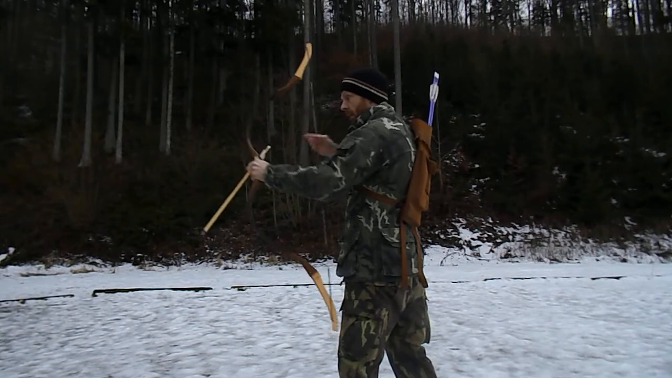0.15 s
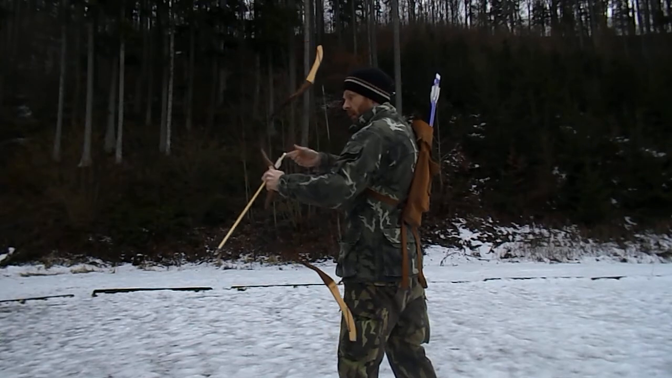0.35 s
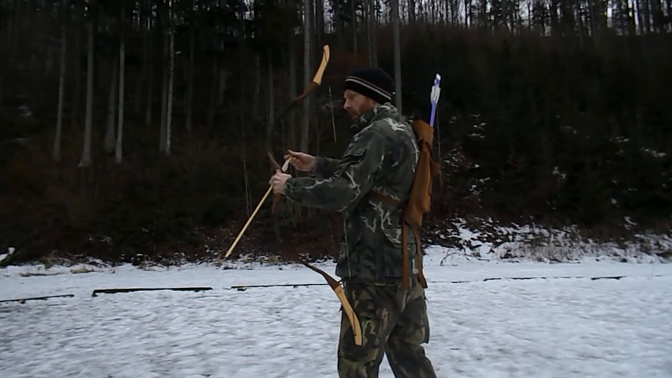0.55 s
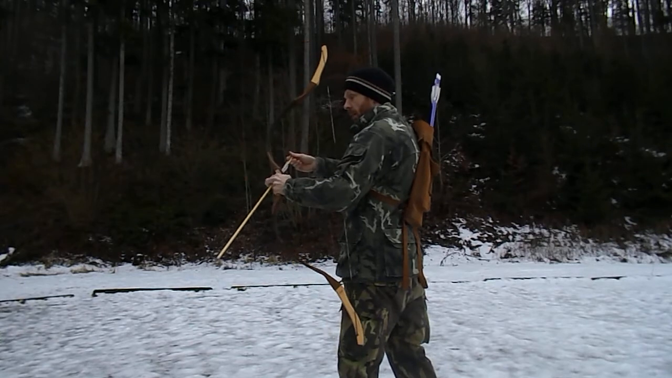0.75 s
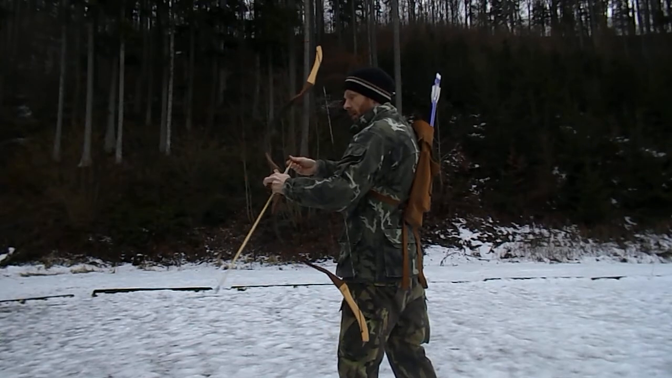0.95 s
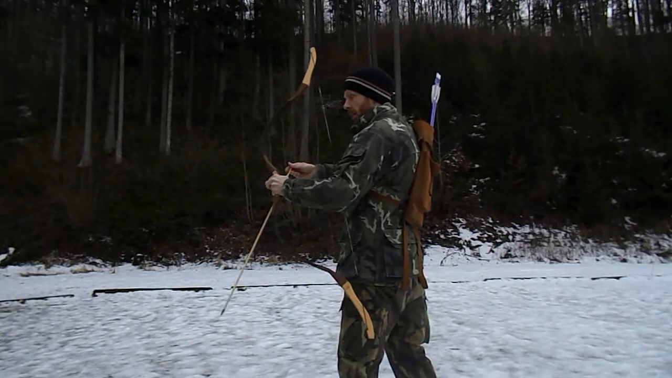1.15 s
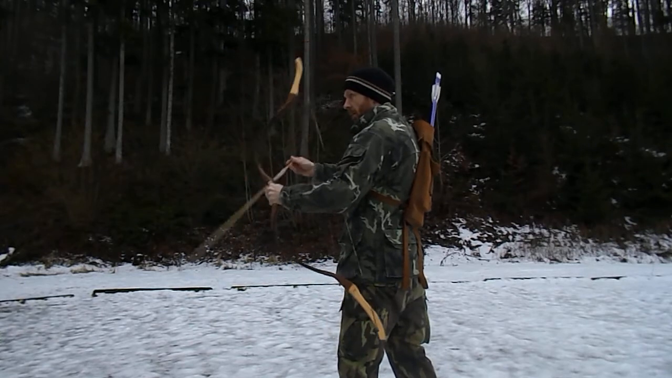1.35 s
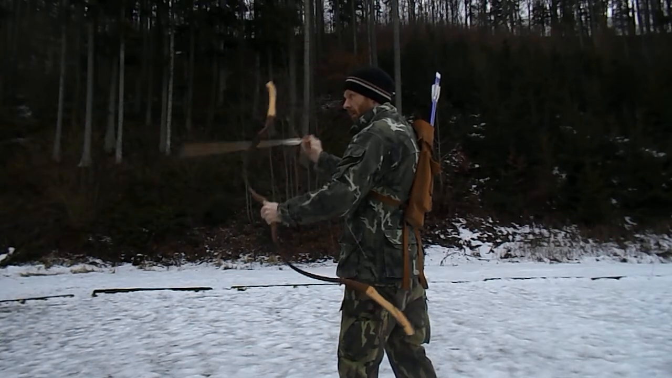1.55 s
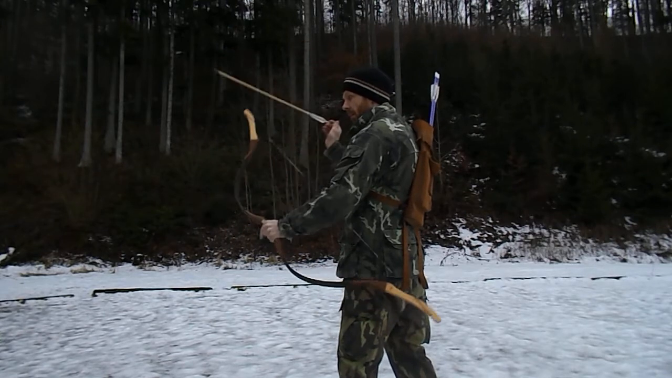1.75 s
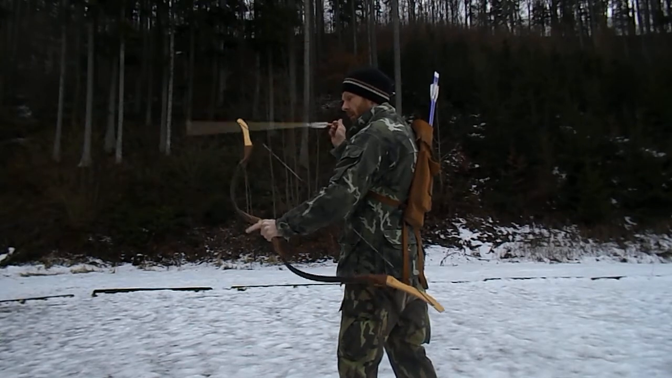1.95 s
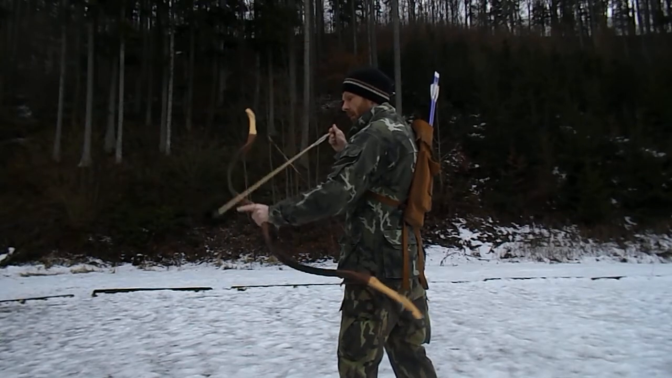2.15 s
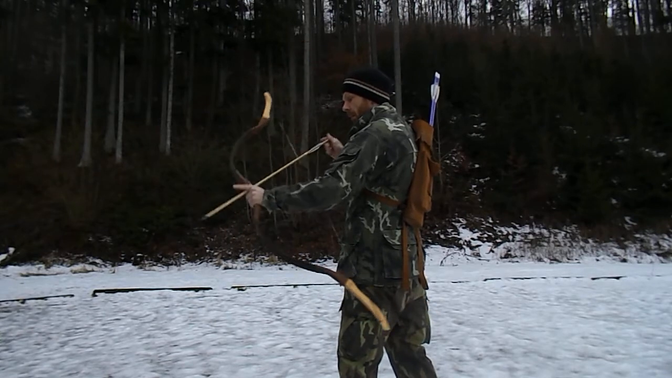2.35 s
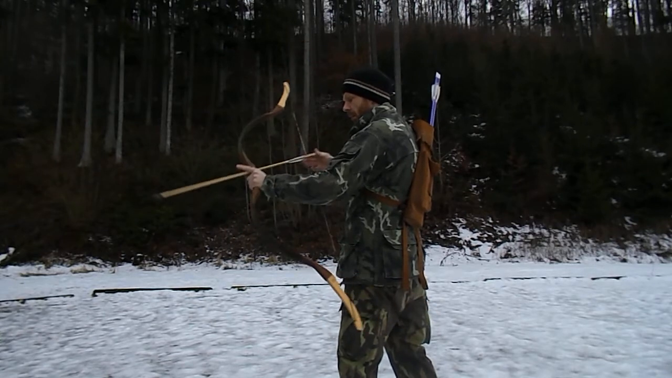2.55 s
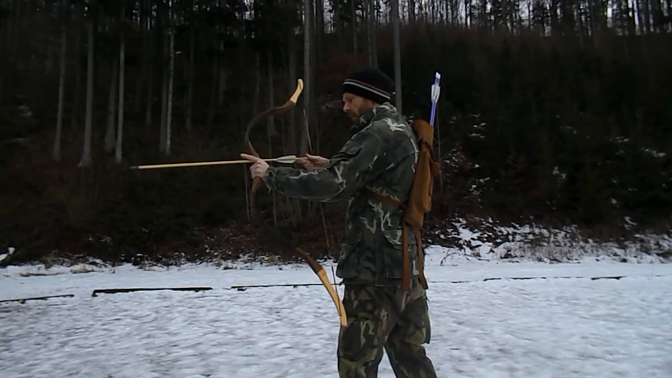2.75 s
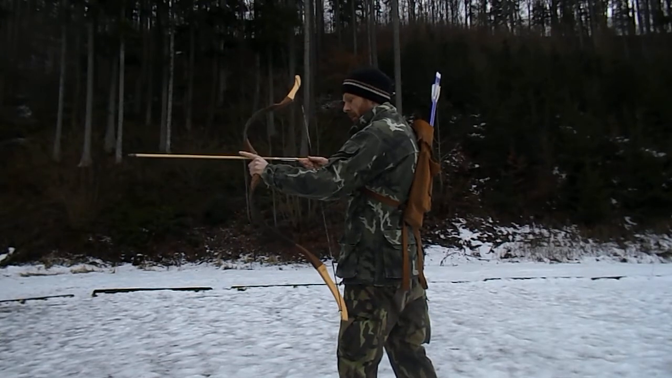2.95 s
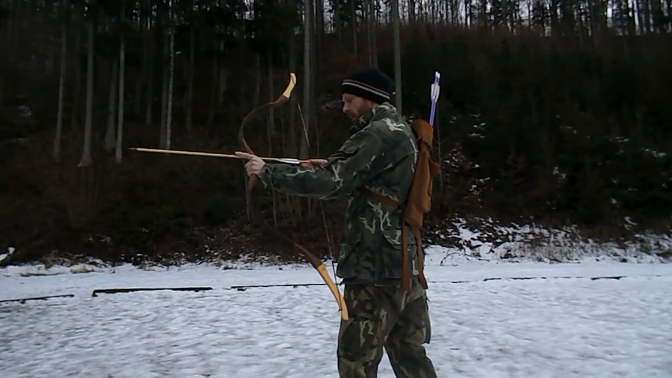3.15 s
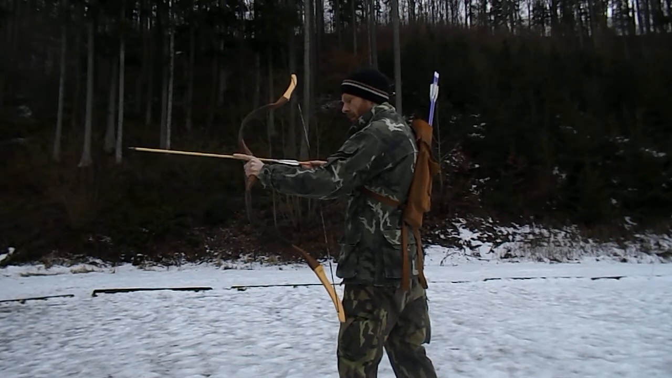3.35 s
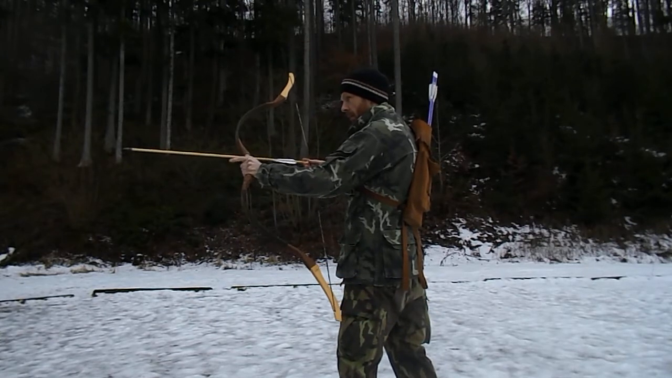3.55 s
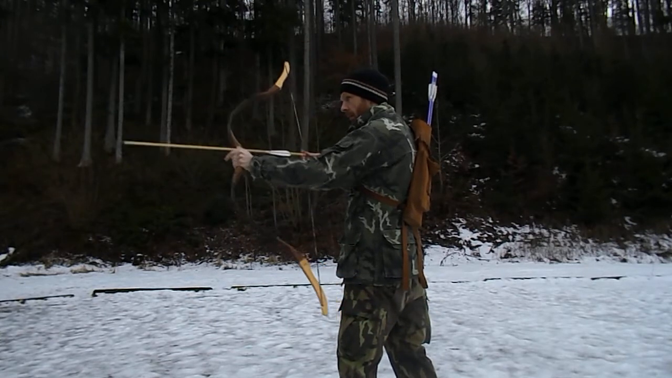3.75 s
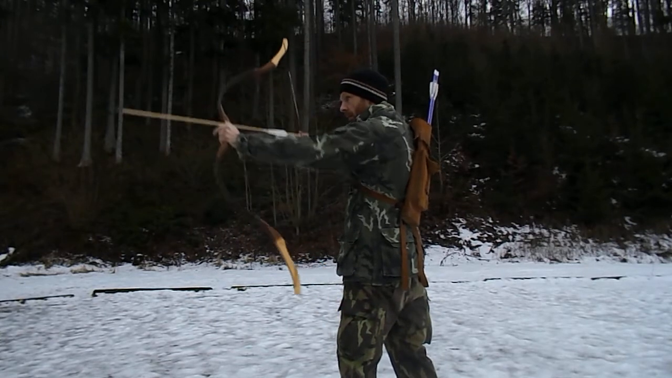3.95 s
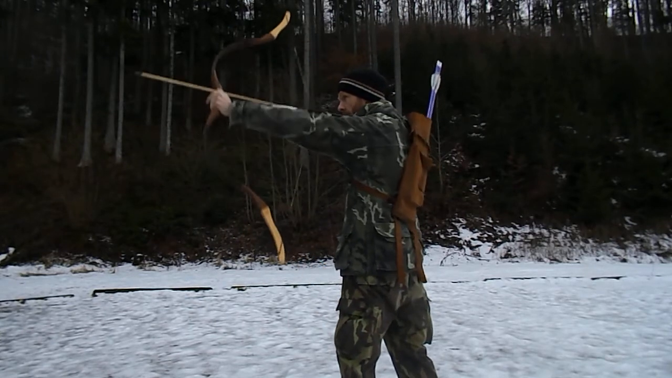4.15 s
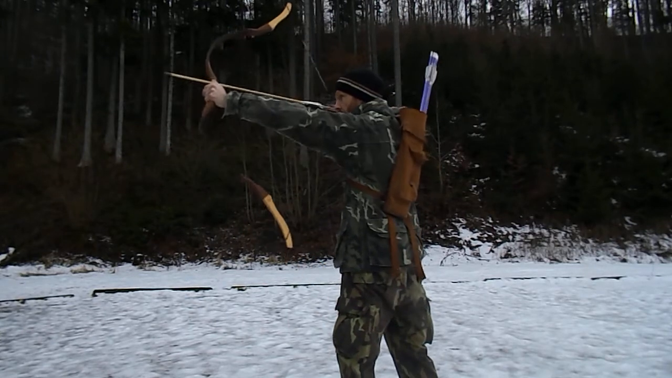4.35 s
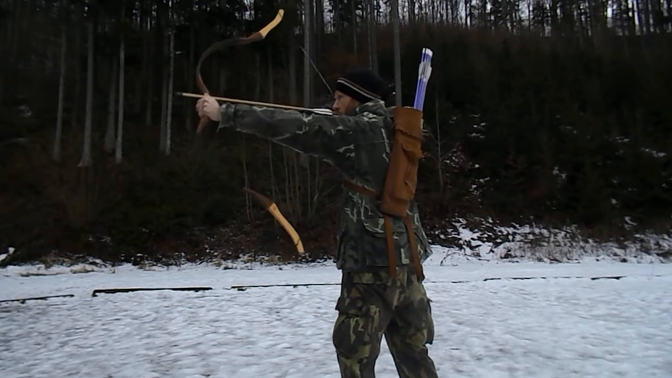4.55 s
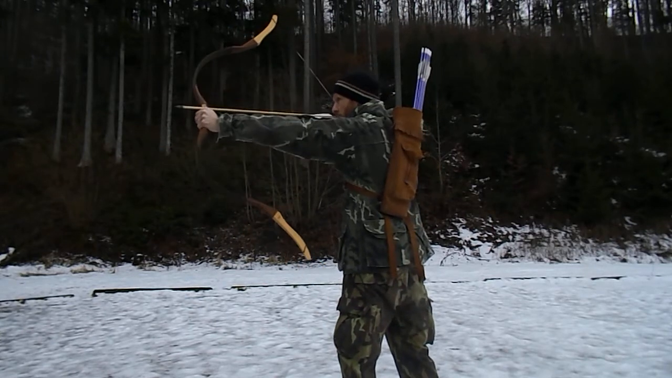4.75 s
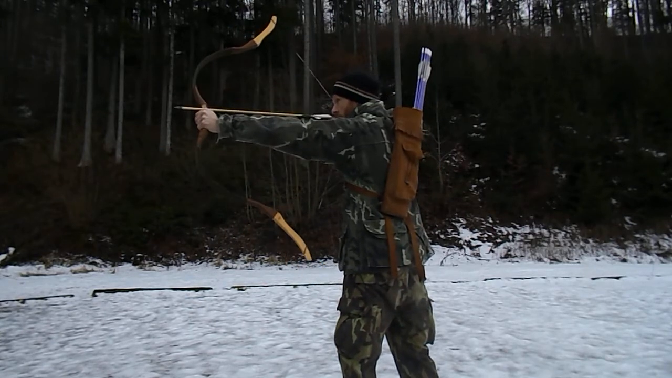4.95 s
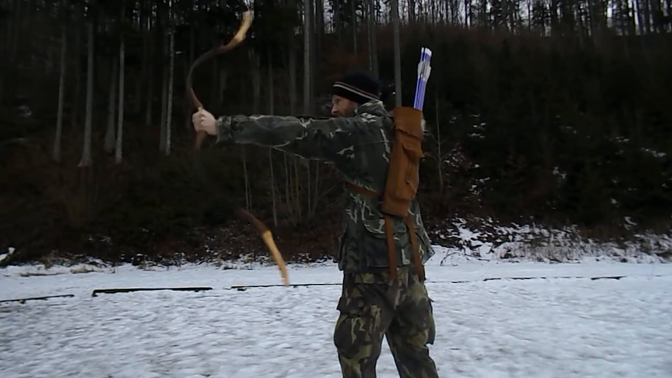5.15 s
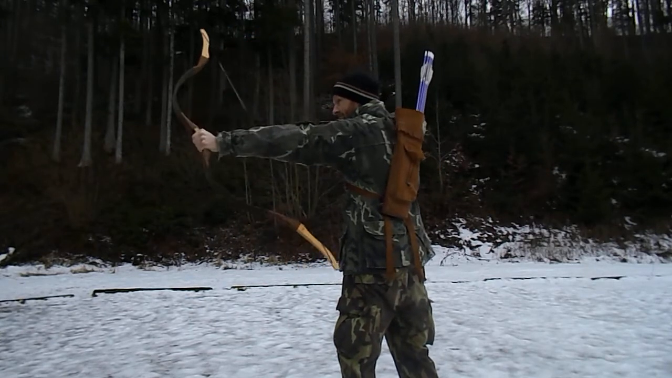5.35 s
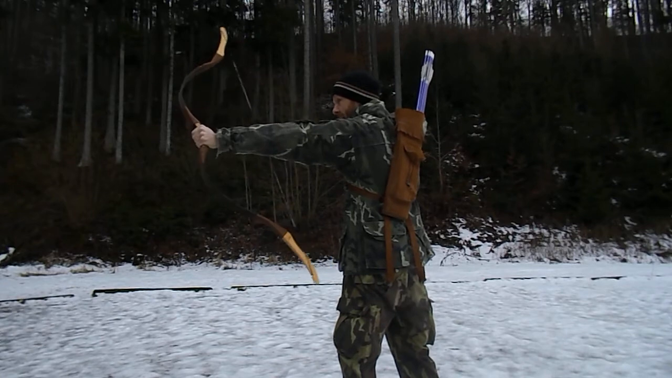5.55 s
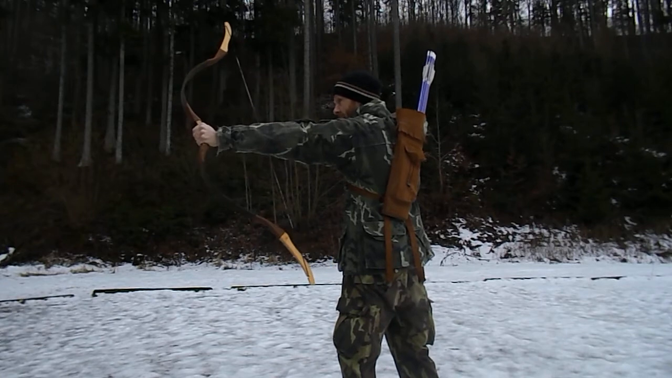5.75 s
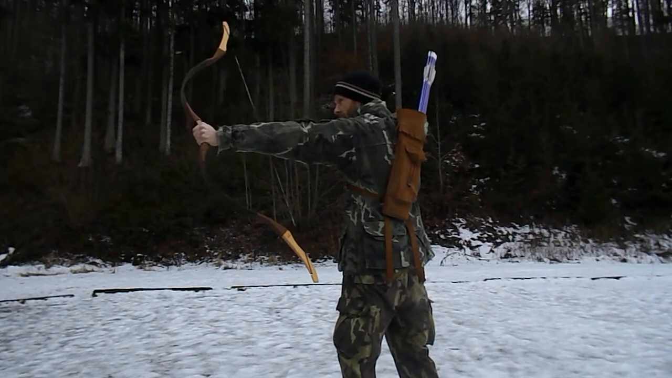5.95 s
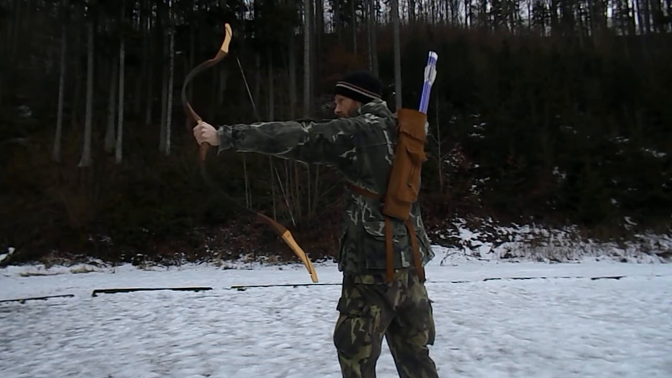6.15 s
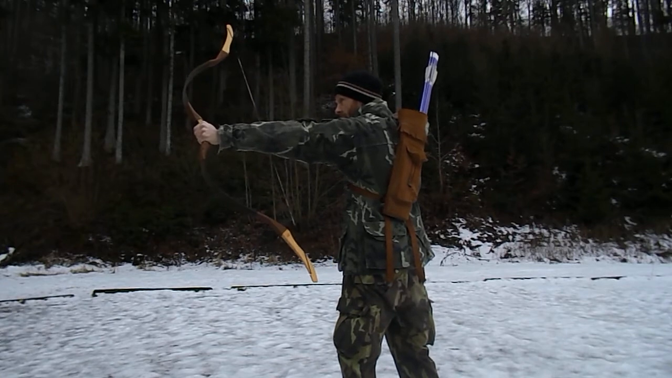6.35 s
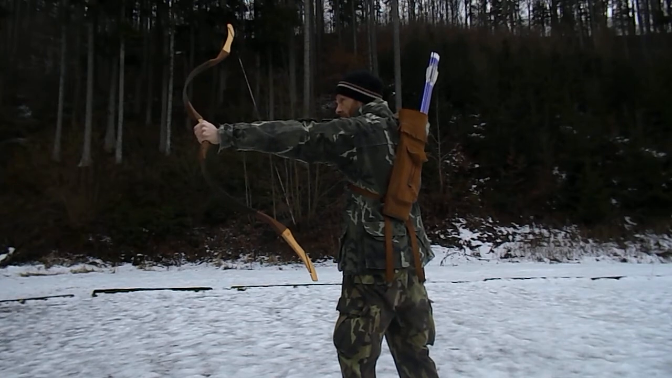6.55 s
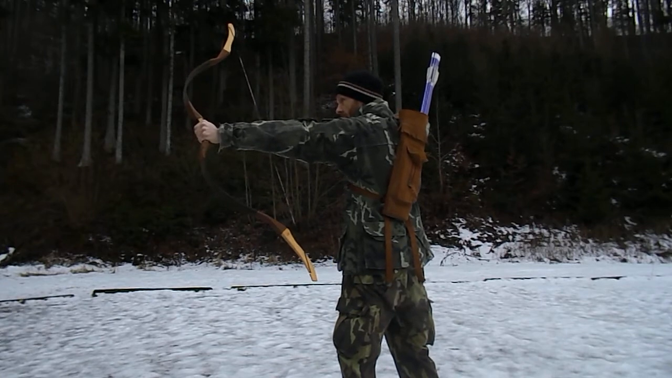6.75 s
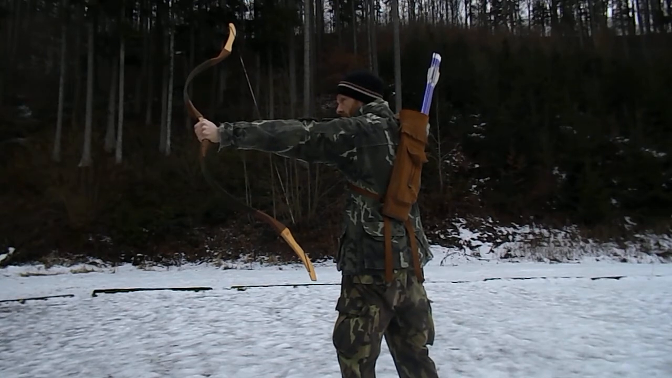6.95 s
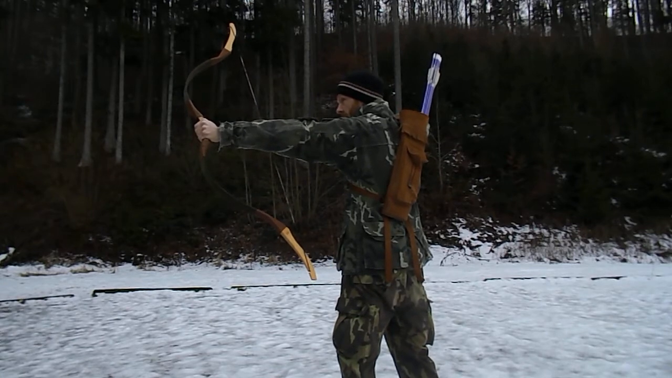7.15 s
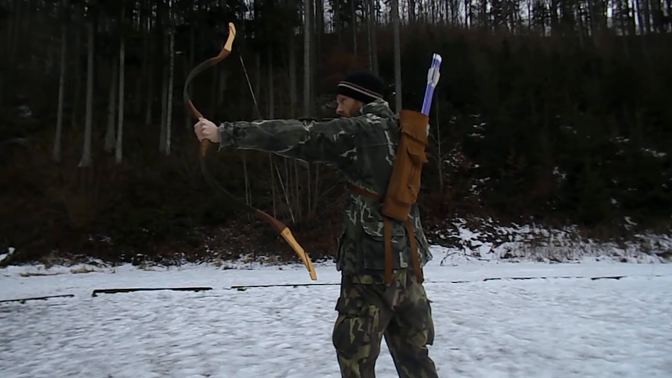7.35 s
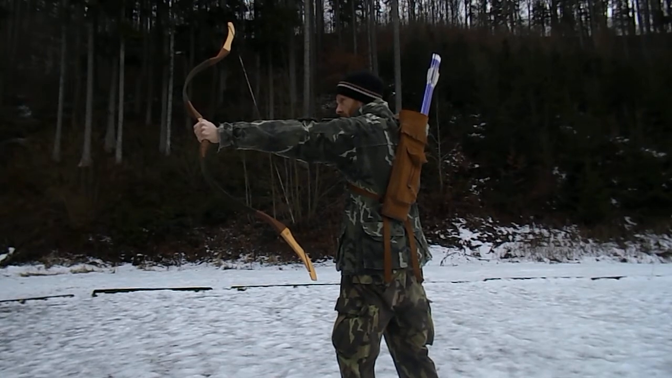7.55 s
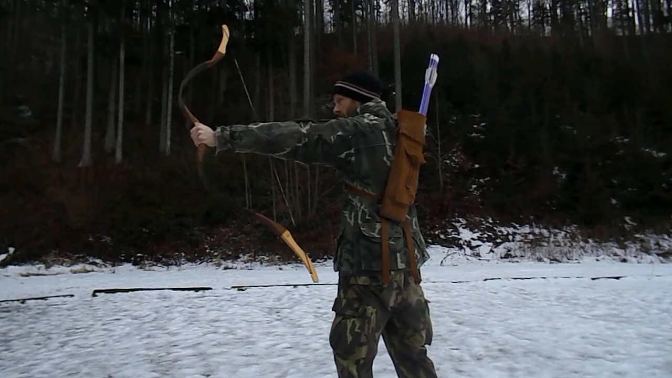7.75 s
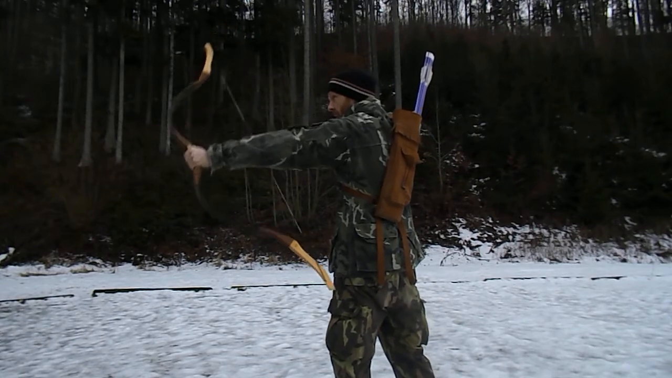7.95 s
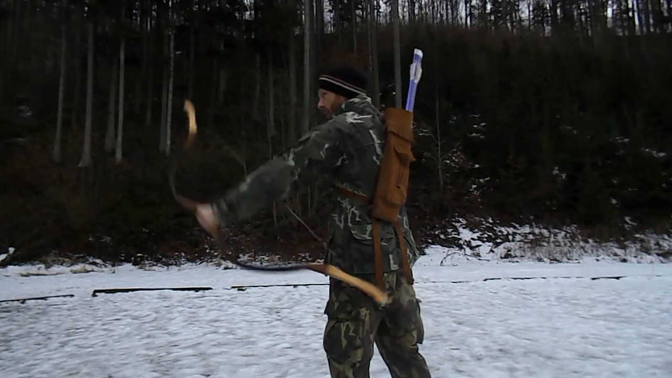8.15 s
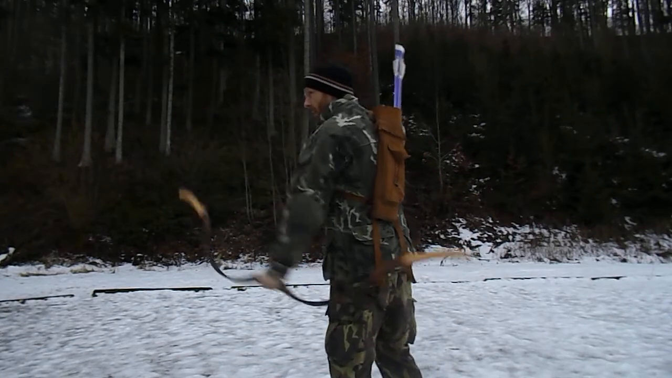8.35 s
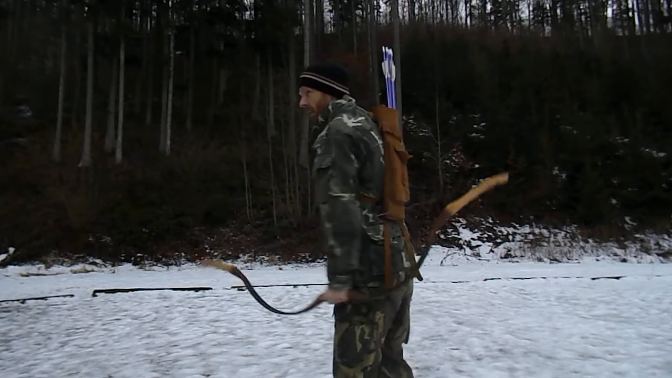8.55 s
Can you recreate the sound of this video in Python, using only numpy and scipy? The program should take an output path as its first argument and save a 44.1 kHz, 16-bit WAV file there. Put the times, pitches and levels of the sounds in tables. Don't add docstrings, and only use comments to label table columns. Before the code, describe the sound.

A quiet forest edge in snow, heard in close natural stereo: soft wash from distant trees, light hiss and barely noticeable wind puffs throughout. A tiny creak comes near 0.9 s, a faint bird phrase at 1.3 s. At 2.2 s an arrow shaft knocks a wooden bow grip, bouncing quickly; from 2.4 to 2.8 s the nock scrapes and ticks crisply onto the string. Between 3.2 and 5 s the bird gives four clear whistles, each followed by a buzzy falling trill, growing louder, over faint cloth and creaks. At 5.19 s the string slaps hard, dry and woody, with short limb hum; at 5.27 s the arrow cracks and crunches into a close target with a compact thud, then rattles around 5.33 s. Short tree reflections fade. Slight cloth brushes and creaks follow from 6.3 s; the bird returns at 7.9 and 8.4 s, and a small strap snap lands at 8.55 s.

```python
import sys
import numpy as np
from scipy import signal
from scipy.fft import rfft, irfft
from scipy.io import wavfile
from scipy.ndimage import uniform_filter1d

SR = 44100
rng = np.random.default_rng(int(sys.argv[2]) if len(sys.argv) > 2 else 0)


def master(y):
    cut = np.clip(np.atleast_2d(y).T, -1, 1)
    pcm = np.round(cut * 32767)
    wavfile.write(sys.argv[1], SR, pcm.astype(np.int16))


def gain_from_db(level_db):
    decades = np.asarray(level_db, float) / 20
    return 10 ** decades


N = 383096

# f/Hz, level per Hz/dB
AIR_SPECTRUM = [(18, -90), (30, -62), (68, -29), (117, -24.5), (145, -16), (174, -13), (412, -0.5),
                (881, -4.5), (953, -2), (1060, -7), (1270, -5.5), (1490, -9), (4590, -16.5), (10300, -18.5),
                (15700, -22)]
AIR_DB = -52
# f/Hz, likeness 0-1
AIR_LIKENESS = [(60, 0.59), (150, 0.35), (600, 0.52), (1400, 0.42), (3000, 0.019), (7000, 0.081)]
# t/s, level/dB, length/s, left-right/dB
PUFFS = [
    (.95, -59, 0.043, -6),
    (1.709, -66, 0.055, 15),
    (1.962, -63, 0.059, 2),
    (8.55, -76, .04, 0),
]
# f/Hz, time to fall 60 dB/s
NEAR_TREES = [(200, 0.33), (1500, 0.32), (5000, 0.06), (12000, 0.13)]
FAR_TREES = [(3000, 0.32), (6000, 0.63)]

# t/s, whistle level/dB, wait for second note/s, its level/dB, its f/Hz
SONG = [
    (1.33, -64, .19, -55, 4700),
    (3.235, -61, 0.22, -54.5, 4780),
    (3.715, -57, .221, -52.5, 4740),
    (4.212, -52, 0.21, -48.5, 4760),
    (4.735, -47.5, .189, -51, 4610),
    (7.935, -59, 0.21, -54, 4730),
    (8.42, -51, 0.2, -49.5, 4670),
]
WHISTLE_S, WHISTLE_HZ = 0.105, 4250
TRILL_S, TRILL_DEPTH_HZ = 0.066, 270

# centre f/Hz, width/octaves, left-right/dB
STRING = (2250, 1.46, -1.05)
GRIP = (700, 1.8, -1)
FEATHERS = (9500, 0.61, -9)
CRUST = (8800, 1.1, -3)
STUFFING = (1500, 2.2, 0)
SPLINTER = (13500, .4, 0)
RATTLE = (8000, 1.4, 0)
NOCK = (7900, 0.6, -8)
SHELF = (3000, 0.9, -3)

# t/s, level/dB, time to fall 60 dB/s
NOCK_HITS = [(2.391, -42.5, 0.017), (2.49, -54.5, 0.53), (2.551, -48, 0.018), (2.609, -50, 0.017),
             (2.612, -42, .015), (2.6559, -46, 0.054), (2.6964, -41, .03), (2.699, -41.5, .03),
             (2.698, -38, 0.03), (2.733, -47, .06), (3.053, -51, .03), (8.547, -31.5, 0.027)]
# t/s, level/dB
TICKS = [
    (2.5415, -42),
    (2.5648, -35),
    (2.5738, -34),
    (2.6035, -32),
    (2.687, -37),
    (2.7565, -32),
]
TICK_T60 = 0.006
# t/s, level/dB, time to fall 60 dB/s
SHELF_HITS = [
    (.9338, -46, .03),
    (2.603, -43, .023),
    (2.697, -40.5, 0.078),
    (2.756, -42, 0.032),
    (4.548, -46, 0.085),
    (8.4976, -50, .03),
]
# t/s, level/dB, centre f/Hz
BRUSHES = [
    (.022, -55.5, 7000),
    (1.47, -54, 10000),
    (3.52, -50, 8500),
    (3.887, -50, 11000),
    (6.295, -51.5, 9500),
    (7.172, -49.5, 10800),
    (7.724, -52, 9500),
    (8.39, -55, 11000),
]
BRUSH_OCTAVES, BRUSH_T60, BRUSH_PAN_DB = 0.29, 0.11, -8
# t/s, level/dB, centre f/Hz
CREAKS = [
    (0.954, -43.5, 334),
    (2.703, -43, 1040),
    (3.31, -53, 3500),
    (3.444, -49.5, 2330),
    (4.568, -46, 4370),
    (6.263, -52, 2400),
    (6.595, -47, 3300),
    (6.655, -48.5, 2320),
]
CREAK_OCTAVES, CREAK_T60, CREAK_PAN_DB = 0.18, 0.065, -1

# t/s, ring level/dB, low ring/dB, tick/dB, freedom to ring 0-1
TAPS = [
    (2.242, -16.5, -2, 10, .8),
    (2.3112, -22, 0, 8, .35),
    (2.3128, -26, 2, 8, .35),
    (2.3144, -27, 0, 7, .4),
    (2.338, -27.5, -2, 5, .45),
]
TAP_PAN_DB = -3
# f/Hz, level/dB, time to fall 60 dB/s
SHAFT_RING = [(625, -7, 0.044), (890, -3.5, 0.12), (1330, -6.5, .06), (1730, -8, .06), (2090, 15.5, 0.0049),
              (2766, -6, 0.07), (3010, -5, 0.035)]

# t/s, level/dB, time to fall 60 dB/s
STRING_HITS = [
    (5.161, -38, 0.079),
    (5.1698, -20.5, .015),
    (5.1817, -40, 0.072),
    (5.1869, -8, 0.027),
    (5.198, -15, 0.02),
    (5.22, -26.5, .078),
]
# t/s, level/dB, time to fall 60 dB/s
GRIP_HITS = [
    (5.174, -22, 0.062),
    (5.189, -8.5, 0.016),
    (5.2, -21, .094),
]
# t/s, level/dB, time to fall 60 dB/s
FEATHER_HITS = [
    (5.1672, -36, .017),
    (5.186, -21.5, 0.02),
    (5.1983, -26.5, 0.033),
    (5.21, -43.5, 0.18),
]
# f/Hz, level/dB, time to fall 60 dB/s
SLAP_RING = [(2610, -1, 0.029), (2560, 0, 0.042), (3300, 9, 0.0079), (3700, 11, 0.0082), (5680, 1, 0.013)]
LIMB_RING = [(331, -11.5, 0.21), (363, -3.5, 0.033), (560, -17, 0.42), (824, -1.5, 0.11), (1187, -8, 0.1),
             (1526, -9, 0.019)]

# t/s, level/dB, time to fall 60 dB/s
CRUST_HITS = [
    (5.27, -6, 0.038),
    (5.274, -12, 0.036),
    (5.2792, -10, .035),
    (5.285, -25.5, 0.081),
]
# t/s, level/dB, time to fall 60 dB/s
STUFFING_HITS = [
    (5.269, -21, 0.045),
    (5.273, -6, 0.031),
    (5.294, -34, 0.11),
    (5.334, -29, 0.076),
    (5.397, -43, 0.39),
]
# t/s, level/dB, time to fall 60 dB/s
SPLINTER_HITS = [
    (5.274, 0, 0.013),
]
# t/s, level/dB, f/Hz, time to fall 60 dB/s
POINT_RINGS = [
    (5.2703, -2, 4950, .02),
    (5.27, -15, 8900, .012),
    (5.2704, -17, 11600, .02),
    (5.273, -3, 8250, .013),
    (5.2755, -10, 5600, .025),
    (5.271, -14, 3700, .03),
    (5.2795, -10, 8800, .015),
]
# f/Hz, level/dB, time to fall 60 dB/s
BUTT_RING = [(355, 4.5, 0.031), (419, -5, 0.039), (600, 2.5, 0.022), (850, -13, 0.028), (1156, -5, 0.022)]
# t/s, level/dB, time to fall 60 dB/s
RATTLE_HITS = [
    (5.327, -40, .06),
    (5.3321, -16, .018),
    (5.3346, -16, 0.039),
    (5.3425, -19.5, 0.022),
    (5.3465, -28, .02),
    (5.369, -36.5, 0.099),
    (5.4126, -33, 0.035),
]


def unit(x):
    return x / np.sqrt(np.mean(x ** 2) + 1e-20)


def along(points, hz):
    f, value = np.transpose(points)
    return np.interp(np.log(hz + 1), np.log(f + 1), value)


def add(track, s, x, pan_db, lead):
    x = x * gain_from_db([[pan_db / 2], [-pan_db / 2]])
    for ear, shift in enumerate((-int(lead), 0)):
        part = track[ear, round(s * SR) + shift:][:x.shape[1]]
        part += x[ear, :len(part)]


def made_of(material, hits):
    centre_hz, octaves, pan_db = material
    return [(s, db, centre_hz, octaves, t60, pan_db) for s, db, t60 in hits]


def contacts(rows, lead, scatter, rise):
    track, size = np.zeros((2, N)), 8192
    t, hz = np.arange(size) / SR, np.fft.rfftfreq(size, 1 / SR)
    share = np.clip(scatter * hz / (hz + 3000), 0, 1)
    for s, db, centre_hz, octaves, t60, pan_db in rows:
        cracks = rng.standard_normal((3, size)) * gain_from_db(4 * rng.standard_normal(size))
        octaves_away = np.log2((hz + 1) / centre_hz)
        resonance = np.exp(-0.5 * (octaves_away / (octaves * 0.75)) ** 2)
        spectra = rfft(cracks) * resonance
        fade = gain_from_db(-60 * t / max(t60, 0.004)) * (1 - np.exp(-t / (rise * t60)))
        mixed = np.sqrt(1 - share) * spectra[0] + np.sqrt(share) * spectra[1:]
        burst = fade * irfft(mixed)
        add(track, s, gain_from_db(db) * unit(burst) * np.sqrt(np.mean(fade ** 2)), pan_db, lead)
    return track


def ring(modes, attack):
    t = np.arange(SR // 3) / SR
    tones = sum(gain_from_db(db - 60 * t / t60) * np.sin(2 * np.pi * hz * t) for hz, db, t60 in modes)
    return tones * (1 - np.exp(-t / attack))


def trees(x, decays):
    hz, t, z = signal.stft(rng.standard_normal((2, SR // 2)), SR, nperseg=256)
    fade = gain_from_db(-60 * t / along(decays, hz)[:, None])
    tail = signal.istft(z * fade, SR, nperseg=256)[1]
    delayed = np.pad(x, ((0, 0), (500, 0)))
    return signal.fftconvolve(delayed, tail / np.linalg.norm(tail[0]), axes=1)[:, :N]


def air():
    hz, _, z = signal.stft(rng.standard_normal((2, N + 512)), SR, nperseg=2048)
    field = uniform_filter1d(rng.standard_normal(z.shape[1:]), 20, 0)
    field = uniform_filter1d(field, 4, 1)
    patches = gain_from_db(0.59 * unit(field) * (hz < 2500)[:, None])
    turn = np.arccos(np.clip(along(AIR_LIKENESS, hz), -1, 1))[:, None] / 2
    mid, side = np.cos(turn) * z[0], np.sin(turn) * z[1]
    lag = np.exp(1j * np.pi * hz * 3 / SR)[:, None]
    pair = np.array([(mid + side) * lag, (mid - side) / lag])
    pair = pair * patches * gain_from_db(along(AIR_SPECTRUM, hz))[:, None] / np.cos(turn)
    wash = signal.istft(pair, SR, nperseg=2048)[1][:, :N]
    return gain_from_db(AIR_DB) * wash / np.std(wash.mean(axis=0))


def wind():
    track = np.zeros((2, N))
    low = signal.butter(2, [70, 450], "bandpass", fs=SR)
    for s, db, length, pan_db in PUFFS:
        rumble = signal.lfilter(*low, rng.standard_normal((2, 8000)))
        puff = unit(rumble[:, -round(length * SR):])
        add(track, s, gain_from_db(db) * puff * np.hanning(puff.shape[1]), pan_db, lead=0)
    return track


def bird():
    track = np.zeros((2, N))
    whistles = [(s, WHISTLE_S, WHISTLE_HZ, db, 0) for s, db, *_ in SONG]
    trills = [(s + wait, TRILL_S, hz, db, TRILL_DEPTH_HZ) for s, _, wait, db, hz in SONG]
    for s, length, pitch_hz, db, depth_hz in whistles + trills:
        u = np.arange(round(length * SR)) / (length * SR)
        trilled = depth_hz > 40
        uneven = np.interp(u, np.linspace(0, 1, num=20), rng.standard_normal(20))
        trill = np.sin(2 * np.pi * np.cumsum(250 + 75 * uneven) / SR)
        glide = 1 - 0.015 * np.exp(-u / 0.2) + 0.025 * trilled * (0.6 - u)
        hz = pitch_hz * glide + depth_hz * trill + 12 * uneven
        swell = np.sin(np.pi * u ** 1.3) ** 1.25
        swell = swell * (1 + 0.1 * trill * trilled) * gain_from_db(1.6 * uneven)
        note = swell * np.sin(2 * np.pi * np.cumsum(hz) / SR)
        add(track, s, gain_from_db(db + 5.5) * note[None], -6, lead=-5.0)
    return track


def handling():
    ticks = [(*row, TICK_T60) for row in TICKS]
    nock = made_of(NOCK, NOCK_HITS + ticks) + made_of(SHELF, SHELF_HITS)
    cloth = [(*row, BRUSH_OCTAVES, BRUSH_T60, BRUSH_PAN_DB) for row in BRUSHES]
    creaks = [(*row, CREAK_OCTAVES, CREAK_T60, CREAK_PAN_DB) for row in CREAKS]
    return contacts(nock + cloth + creaks, lead=0, scatter=0.71, rise=0.022)


def taps():
    track, t = np.zeros((2, N)), np.arange(SR // 3) / SR
    swing = -np.sin(2 * np.pi * 2900 * t) * np.sin(np.pi * 2900 * t) * (t < 1 / 2900)
    for s, db, low_db, tick_db, free in TAPS:
        modes = []
        for hz, level, t60 in SHAFT_RING:
            mode_hz = hz * rng.normal(1, 0.0084)
            mode_db = level + rng.normal(0, 1) + (hz < 1200) * low_db
            modes.append((mode_hz, mode_db, t60 * max(free, 0.1)))
        grit = signal.lfilter([0.3, 0, -0.3], [1, -1.55, 0.68], rng.standard_normal(len(t)))
        grit = gain_from_db(-5 - 60 * t / 0.016) * grit
        knock = gain_from_db(tick_db) * (swing + grit) - ring(modes, attack=0.00014)
        add(track, s, gain_from_db(db - 14) * knock[None], TAP_PAN_DB, lead=1)
    return track


def bow():
    hits = made_of(STRING, STRING_HITS) + made_of(GRIP, GRIP_HITS) + made_of(FEATHERS, FEATHER_HITS)
    track = contacts(hits, lead=1, scatter=0.17, rise=0.014)
    slap = ring(SLAP_RING, attack=0.0005)[None]
    duller_slap = signal.lfilter([0.4], [1, -0.6], slap)
    add(track, 5.1869, gain_from_db(-8) * slap, -1, lead=1)
    add(track, 5.1886, gain_from_db(-8) * duller_slap, -1, lead=1)
    add(track, 5.1885, gain_from_db(-16.5) * ring(LIMB_RING, attack=0.0006)[None], 0, lead=0.33)
    return track


def butt():
    entry = made_of(CRUST, CRUST_HITS) + made_of(STUFFING, STUFFING_HITS) + made_of(SPLINTER, SPLINTER_HITS)
    track = contacts(entry + made_of(RATTLE, RATTLE_HITS), lead=5, scatter=0.3, rise=0.012)
    for s, db, hz, t60 in POINT_RINGS:
        add(track, s, ring([(hz, db, t60)], attack=0.0006)[None], -1, lead=5)
    add(track, 5.2736, gain_from_db(-10) * ring(BUTT_RING, attack=0.0015)[None], 0, lead=5)
    return track


def scene():
    near = bow() + butt() + taps() + handling()
    near_band = signal.butter(3, [210, 15000], "bandpass", fs=SR, output="sos")
    near = signal.sosfilt(near_band, near)
    near_tail = gain_from_db(-19.5) * trees(near, NEAR_TREES)
    song = bird()
    held_on = np.roll(song, round(0.09 * SR), axis=1) * (np.arange(N) > SR)
    song_tail = trees(gain_from_db(-9.5) * song + gain_from_db(-16.0) * held_on, FAR_TREES)
    return near + near_tail + song + gain_from_db(-14) * held_on + song_tail + air() + wind()


def top_cut(x):
    return signal.sosfilt(signal.butter(12, 15890, fs=SR, output="sos"), x)


def record(dry):
    clipped = dry / (1 + np.abs(dry) ** 8) ** (1 / 8)
    return top_cut(clipped)


dry = scene()
out = record(dry)
master(out)
```